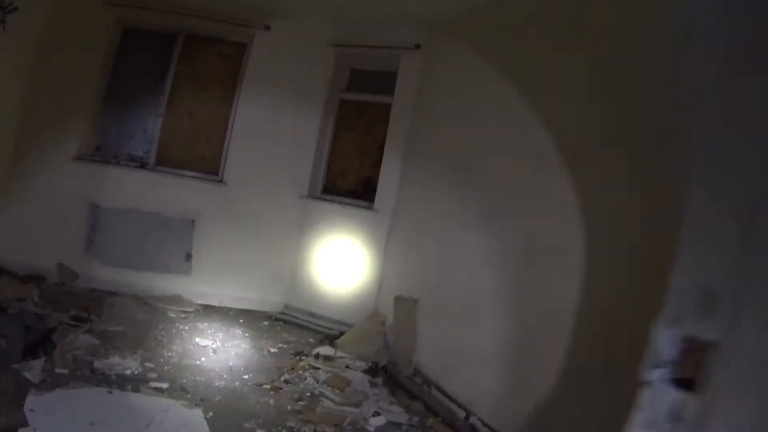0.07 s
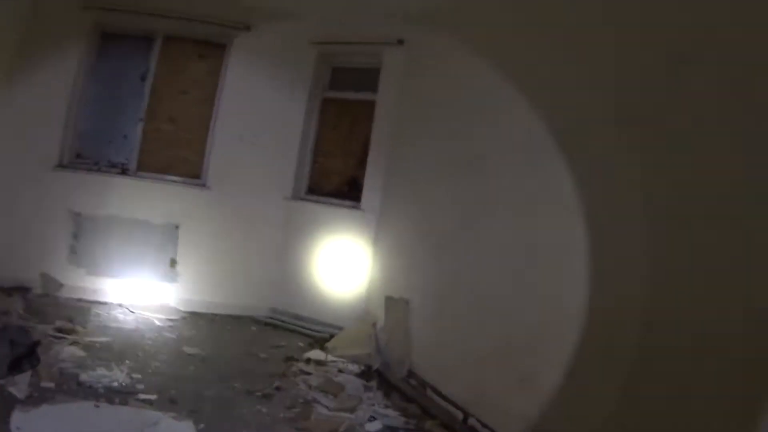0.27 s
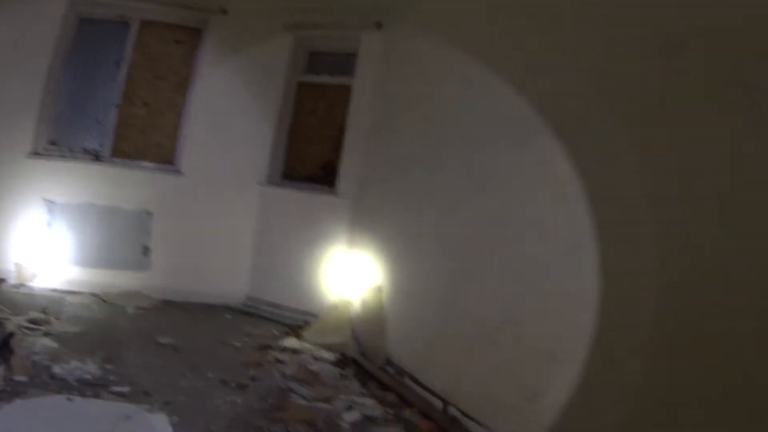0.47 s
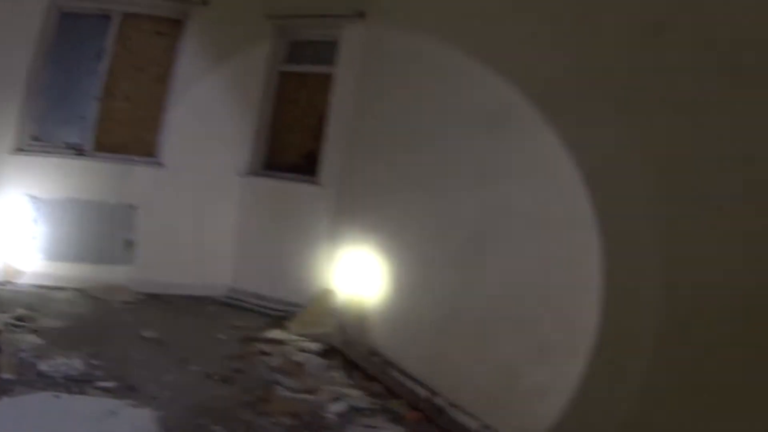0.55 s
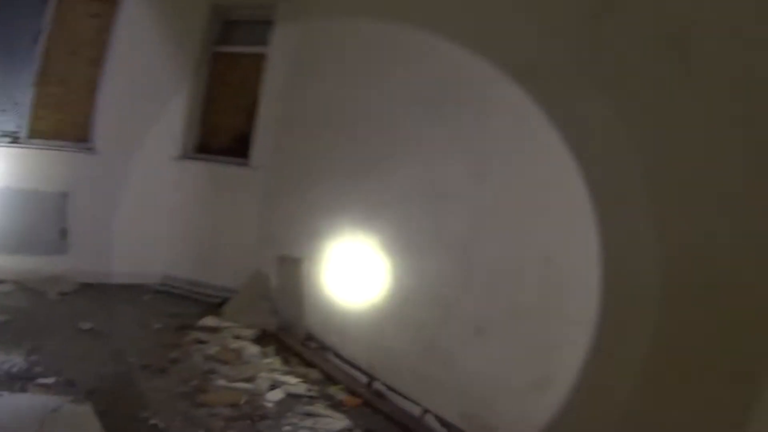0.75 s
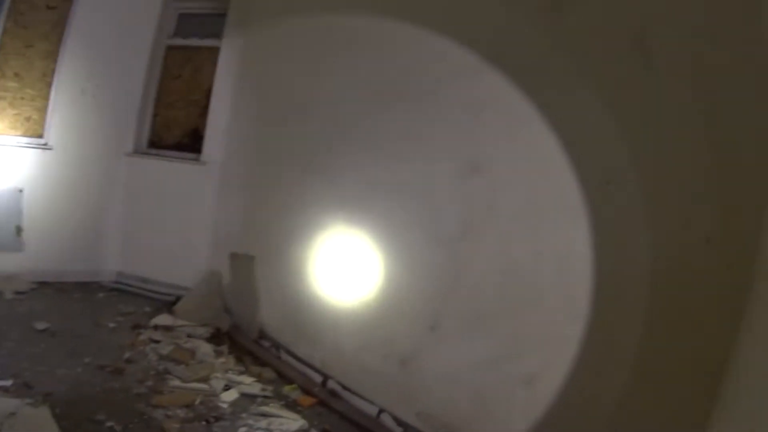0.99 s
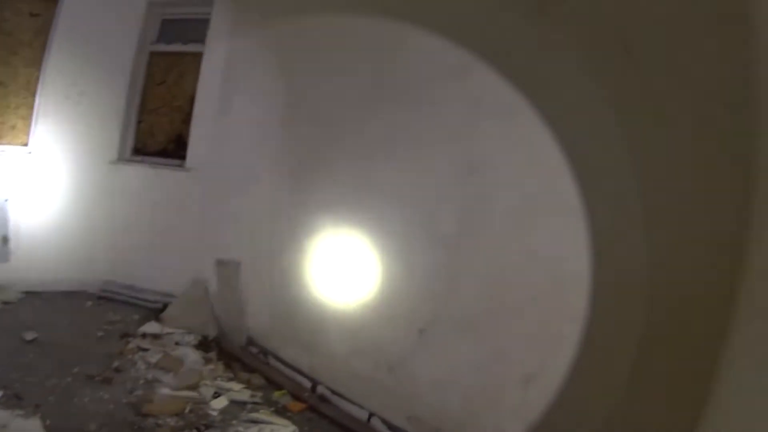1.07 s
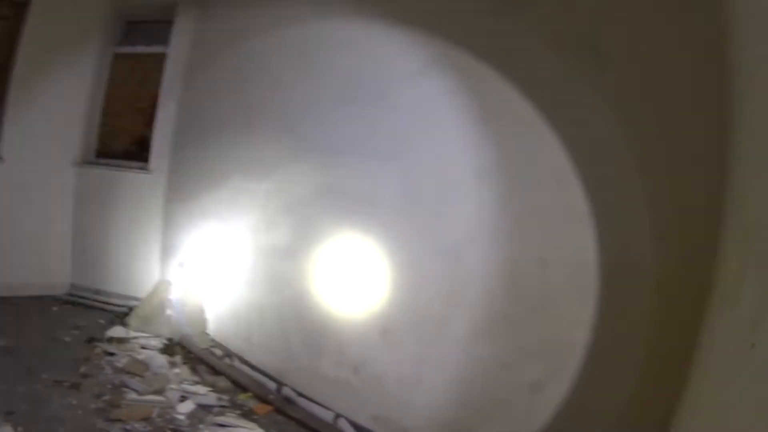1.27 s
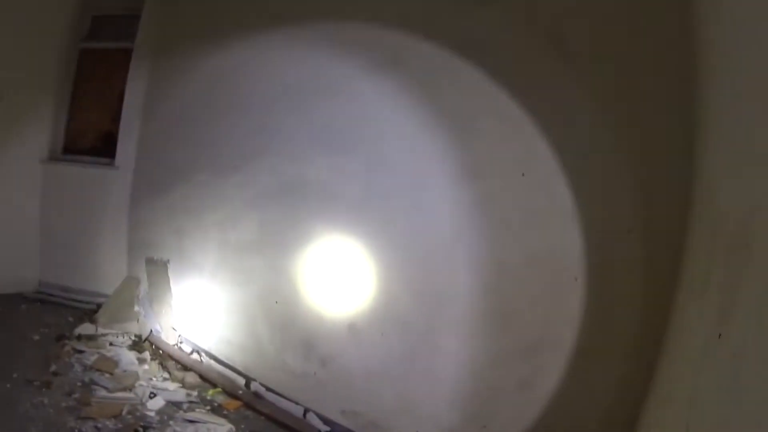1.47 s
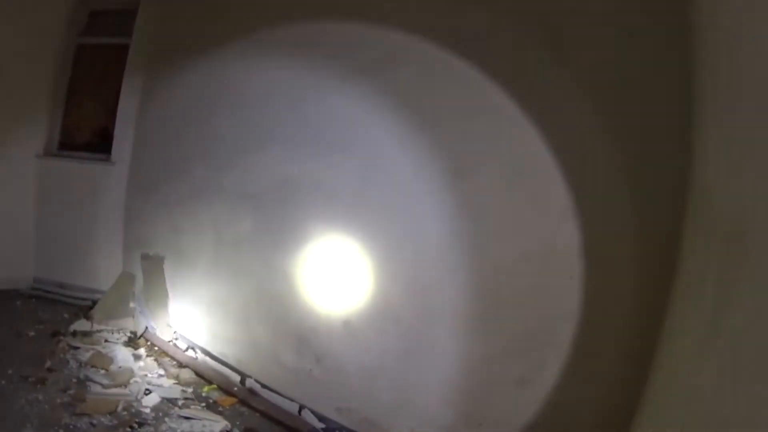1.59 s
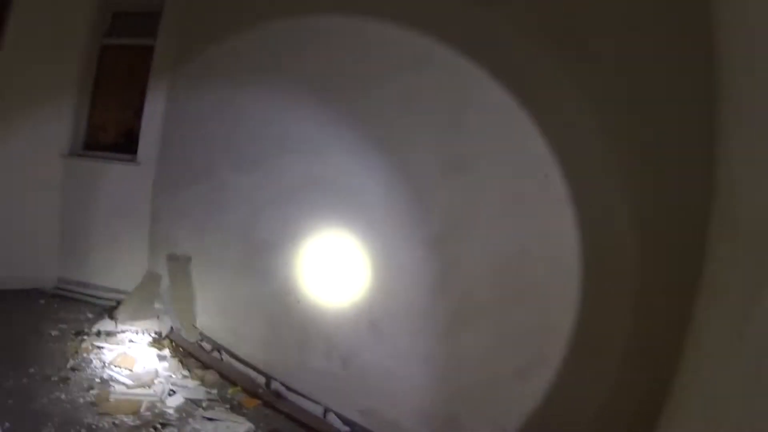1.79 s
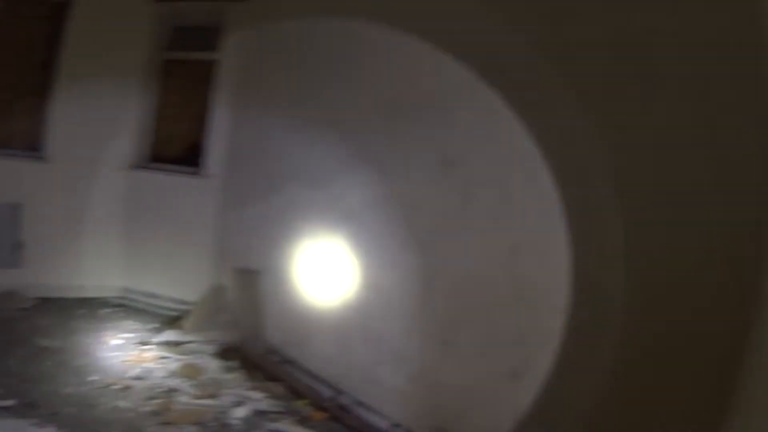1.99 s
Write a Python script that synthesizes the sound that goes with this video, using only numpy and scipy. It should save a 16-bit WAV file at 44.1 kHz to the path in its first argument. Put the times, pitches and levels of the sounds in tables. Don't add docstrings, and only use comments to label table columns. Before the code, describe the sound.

Three sharp crunches of plaster rubble under a boot, with short hollow room echo, then faint taps

```python
import sys
import numpy as np
from scipy import signal
from scipy.fft import rfft, irfft
from scipy.io import wavfile
from scipy.ndimage import uniform_filter1d

SR = 44100
rng = np.random.default_rng(int(sys.argv[2]) if len(sys.argv) > 2 else 0)


def natural_amplitude(level_db):
    exponent = np.asarray(level_db, float) / 20
    return 10 ** exponent


def to_wav(s):
    ch = np.atleast_2d(s).T
    pcm = np.round(np.clip(ch, -1, 1) * 32767)
    wavfile.write(sys.argv[1], SR, pcm.astype(np.int16))


N = 90404
LEAD, SIZE = SR // 10, 1 << 17
HZ = np.arange(SIZE // 2 + 1) * SR / SIZE
S = 2j * np.pi * HZ


def shard(walls):
    # (time [s], level [dB], polarity, low edge [Hz], sharpness [Hz])
    shard_slips = [
        (.20423, -2.5, 1, 3500, 2800),
        (.20475, -15, 1, 400, 20000),
        (.20639, -25, -1, 1300, 9000),
    ]
    # (frequency [Hz], level [dB], t60 [s])
    shard_modes = [(529.2, -11, .03), (854, -33.5, .011), (1153, -1, 0.01), (1400, -0.5, 0.015),
                   (1664, 1.5, .007), (2171, 0.5, 0.00818), (3000, -17, 0.0061), (3700, -8, .006),
                   (4690, 5.5, .007), (4960, -8.5, .006), (5987, -1, 0.0061), (6510, -2.5, .009),
                   (7960, -3, 0.0041), (10200, -9.5, .004)]
    # (frequency [Hz], level [dB per Hz])
    shard_air = [(120, -69), (200, -22), (411, -4), (727, -5), (875, -1.5), (2780, -13), (3230, -10),
                 (8700, -22), (11000, -32.5), (14300, -95), (22000, -120)]
    # (left lag [s], left minus right [dB], room level [dB])
    shard_place = (.00001, -2, -32)
    return in_room(shard_slips, shard_modes, shard_air, shard_place, walls)


def slab(walls):
    # (time [s], level [dB], polarity, low edge [Hz], sharpness [Hz])
    slab_slips = [
        (.3523, -22, -1, 150, 600),
        (.35542, -12, -1, 221, 8000),
        (.356, -4.4, 1, 289, 3400),
    ]
    # (frequency [Hz], level [dB], t60 [s])
    slab_modes = [(155, -8, .035), (482, -12.5, .045), (650, -24, .04), (780, -19, .04), (965, -19, .04),
                  (1140, -9, .022), (1450, -5, .006),
                  (1740, -11.5, 0.0078), (2430, -19, .01), (3000, -11.5, 0.0057), (3456, -18, 0.02),
                 (4620, -17, .008), (6280, -19, .006), (8470, -27, .003)]
    # (frequency [Hz], level [dB per Hz])
    slab_air = [(70, -38.5), (130, -13), (260, -19.5), (440, 3), (690, -8.5), (1090, -3), (1760, -12.5),
                (3500, -20), (11000, -48), (14000, -85.5)]
    # (left lag [s], left minus right [dB], room level [dB])
    slab_place = (.00007, .3, -29.5)
    return in_room(slab_slips, slab_modes, slab_air, slab_place, walls)


def chip(walls):
    # (time [s], level [dB], polarity, low edge [Hz], sharpness [Hz])
    chip_slips = [
        (.12195, -15, -1, 1385, 3300),
        (.12233, -39, 1, 380, 5400),
    ]
    # (frequency [Hz], level [dB], t60 [s])
    chip_modes = [(509, -0.5, 0.012), (812, 5.5, .017), (1530, -15, .009), (2210, -6, 0.0045),
                  (3370, -8, 0.0055), (4350, -1.5, 0.0015), (8000, -20, 0.009)]
    # (frequency [Hz], level [dB per Hz])
    chip_air = [(120, -30), (200, -11), (875, -7.5), (1960, -12.5), (2310, -13.5), (3080, -10.5),
                (3400, -8), (11000, -43), (14300, -64), (22000, -120)]
    # (left lag [s], left minus right [dB], room level [dB])
    chip_place = (.00002, -1, -46.5)
    return in_room(chip_slips, chip_modes, chip_air, chip_place, walls)


def earlier_crack(walls):
    # (time [s], level [dB], polarity, low edge [Hz], sharpness [Hz])
    earlier_slips = [
        (-0.04, -21, 1, 300, 7400),
    ]
    # (frequency [Hz], level [dB], t60 [s])
    earlier_modes = [(400, -1.5, 0.014), (780, -5, .02), (1400, 3, 0.014), (2316, 0.5, .02),
                     (3600, -11.5, .01), (7000, -22.5, .005)]
    # (frequency [Hz], level [dB per Hz])
    earlier_air = [(90, -21), (130, -7), (250, -14.5), (395, 6), (600, -11), (850, -3.5), (2400, -7.5),
                   (3300, -16), (11000, -40.5), (14000, -75)]
    # (left lag [s], left minus right [dB], room level [dB])
    earlier_place = (0, 0, -35)
    return in_room(earlier_slips, earlier_modes, earlier_air, earlier_place, walls)


def settling_taps(walls):
    # (time [s], level [dB], polarity, low edge [Hz], sharpness [Hz])
    tap_slips = [
        (.796, -57.5, 0.73, 610, 3000),
        (.9555, -49, 0.3, 99, 1266),
        (.9575, -55, -0.29, 98, 1400),
        (.9612, -47.5, 0.87, 103, 1190),
    ]
    # (frequency [Hz], level [dB], t60 [s])
    tap_modes = [(171, 1, 0.041), (746, -0.5, 0.057), (1016, 0.5, 0.061), (1320, 8, 0.015),
                 (2260, -21, 0.028)]
    # (frequency [Hz], level [dB per Hz])
    tap_air = [(300, 0), (900, 2.5), (2500, -10), (6000, -21.5)]
    # (left lag [s], left minus right [dB], room level [dB])
    tap_place = (0, 0, -59.5)
    return in_room(tap_slips, tap_modes, tap_air, tap_place, walls)


def grit(walls):
    # (time [s], level [dB], polarity, low edge [Hz], sharpness [Hz])
    grit_slips = [
        (.0575, -65, 1, 4000, 8840),
        (1.512, -62, 0.83, 4000, 9000),
    ]
    # (frequency [Hz], level [dB], t60 [s])
    grit_modes = [(6460, -11, .003), (9700, -0.5, 0.0059)]
    # (left lag [s], left minus right [dB], room level [dB], unused here)
    grit_place = (0, 0, 0)
    return in_room(grit_slips, grit_modes, None, grit_place, walls)


def in_room(slips, modes, air, place, walls):
    lag, pan_db, room_db = place
    late = S * lag / 2 / (1 + (HZ / 2500) ** 2)
    ports = sides(pan_db) * np.exp(np.array([-late, late]))
    out = piece(slips, modes) * (ports + walls)
    if air:
        middle_slip_s = slips[len(slips) // 2][0]
        out = out + tail(middle_slip_s, air, room_db)
    return out


def piece(slips, modes):
    push = 0
    for at, db, sign, low_hz, top_hz in slips:
        u = 1j * HZ / low_hz
        radiate = (u * u / (u * u + 1.2 * u + 1)) ** 2
        blunt = 1 / (1 + 1j * HZ / top_hz) ** 2
        push = push + sign * natural_amplitude(db) * np.exp(-S * (at + LEAD / SR)) * blunt * radiate
    return push * ring(modes)


def ring(modes):
    out = 0
    for hz, db, t60 in modes:
        omega = 2 * np.pi * hz
        damping = np.log(1000) / t60
        out = out + natural_amplitude(db) * SR * omega / ((S + damping) ** 2 + omega ** 2)
    return out


def sides(db):
    return natural_amplitude(np.array([[db / 2], [-db / 2]]))


def slaps():
    # (delay [s], level [dB], left minus right [dB], low edge [Hz], top [Hz])
    wall_slaps = [
        (.0056, -11.5, 11, 811, 5006),
        (.0112, -15, -11.5, 500, 2500),
        (.0192, -16, 5.5, 1500, 8000),
        (.0262, -17.5, -3, 1500, 9000),
        (.0305, -23, -2, 900, 5000),
    ]
    smear_s, clear = .002, .4
    t, out = np.arange(SIZE) / SR, 0
    for delay, db, pan_db, low_hz, top_hz in wall_slaps:
        rough = rng.standard_normal(SIZE) * np.exp(-t / smear_s)
        wall = clear + rfft(rough / np.sqrt(np.sum(rough ** 2)))
        colour = HZ / (HZ - 1j * low_hz) / (1 + 1j * HZ / top_hz) ** 2
        out = out + natural_amplitude(db) * sides(pan_db) * wall * np.exp(-S * delay) * colour
    return out


def standing_waves():
    # (frequency [Hz], level [dB], t60 [s])
    room_modes = [(409, -67, .45), (436.5, -64, 0.56), (488.8, -67.5, 0.35)]
    return ring(room_modes)


def tail(at, air, db):
    # (frequency [Hz], t60 [s], side minus mid [dB])
    room_decay = [(120, .5, -13.5), (235.4, .5, -13), (448.7, .42, -13), (900, .45, -10), (1800, 0.43, -8),
                  (3500, .5, -9.5), (7020, 0.47, -7), (11880, .3, -4)]
    build_s, patchy_db = .01, 2.5
    t, out = np.arange(SIZE) / SR, 0
    noise = rfft(rng.standard_normal((2, SIZE))) * natural_amplitude(along(air, 1))
    noise = noise / irfft(noise[0]).std()
    build = 1 - np.exp(-(t / build_s) ** 2)
    log_centres = np.log(np.array(room_decay)[:, 0])
    for k, (hz, t60, side_db) in enumerate(room_decay):
        share = np.interp(np.log(HZ + 1), log_centres, np.arange(len(room_decay)) == k)
        patch = uniform_filter1d(np.repeat(rng.standard_normal(SIZE // 256), repeats=256), size=400)
        envelope = build * natural_amplitude(db - 60 * t / t60 + patchy_db * patch)
        mid, side = irfft(noise * share) * envelope
        out = out + mid + natural_amplitude(side_db) * side * np.array([[1], [-1]])
    return rfft(out) * np.exp(-S * (at + LEAD / SR))


def along(table, col):
    table = np.array(table)
    return np.interp(np.log(HZ + 1), np.log(table[:, 0]), table[:, col])


def coloured(shape, db):
    x = irfft(rfft(rng.standard_normal(SIZE)) * natural_amplitude(along(shape, 1)) * (HZ > 10))
    return x / x.std() * natural_amplitude(db)


def rumble():
    # (frequency [Hz], level [dB per Hz])
    rumble_shape = [(12, -32), (20, 1.5), (44, -2.5), (57, -4), (80, -9.5), (140, -19.5), (180, -42),
                    (310, -120)]
    swell = uniform_filter1d(rng.standard_normal(SIZE), size=2500)
    swell_db = 1.2 * swell / swell.std()
    return coloured(rumble_shape, -63) * natural_amplitude(swell_db)


def floor():
    # (frequency [Hz], level [dB per Hz])
    hiss_mid = [(76, -32.5), (130, -4), (228, -7.5), (331, -9), (549, -11), (2900, -17), (10600, -31),
                (11400, -36), (14800, -73), (22000, -120)]
    # (frequency [Hz], level [dB per Hz])
    hiss_side = [(12, -59.5), (20, -13.5), (230, -4), (333, -8.5), (371, -2), (822, -1.5), (3270, -10),
                 (10500, -32.5), (11400, -26), (14800, -68.5), (22000, -120)]
    mid = coloured(hiss_mid, -66) + rumble()
    side = coloured(hiss_side, -65)
    return np.array([mid + side, mid - side])


def scene():
    walls = slaps() + standing_waves()
    out = 0
    for source in (shard, slab, chip, earlier_crack, settling_taps, grit):
        out = out + source(walls)
    return (irfft(out) + floor())[:, LEAD:LEAD + N]


def low_pass(x):
    return signal.sosfilt(signal.butter(12, 11520, fs=SR, output="sos"), x)


def record(dry):
    mic = signal.ellip(7, .3, 60, 10950, fs=SR, output="sos")
    mix = signal.sosfilt(mic, dry)
    return low_pass(mix)


dry = scene()
out = record(dry)
to_wav(out)
```